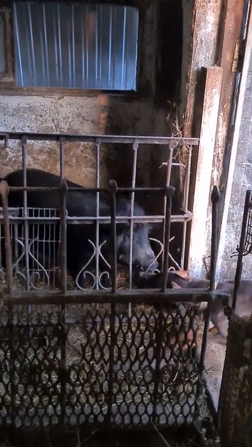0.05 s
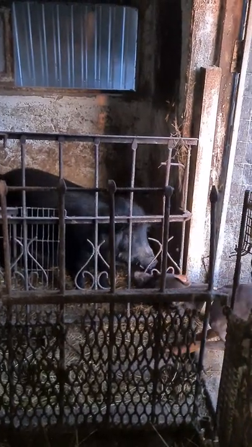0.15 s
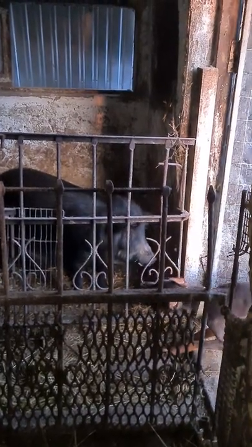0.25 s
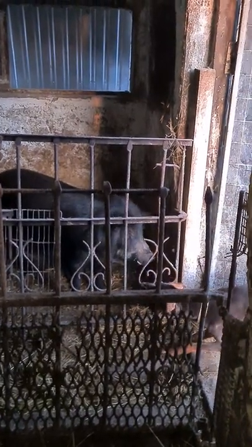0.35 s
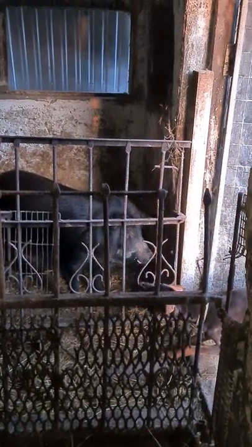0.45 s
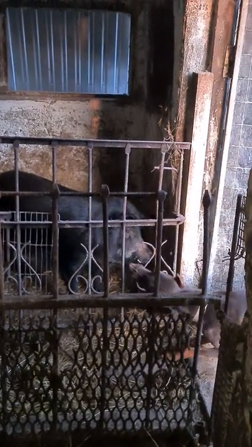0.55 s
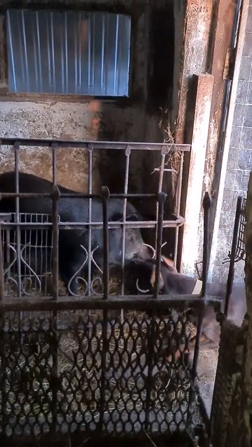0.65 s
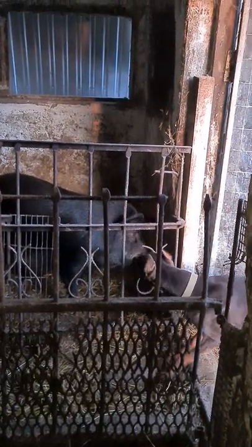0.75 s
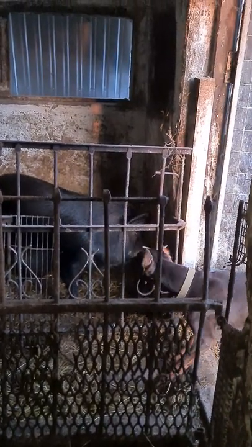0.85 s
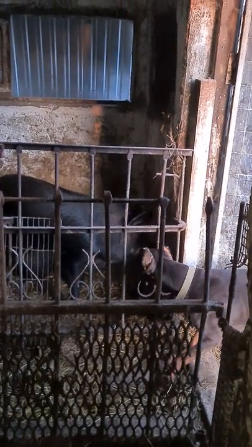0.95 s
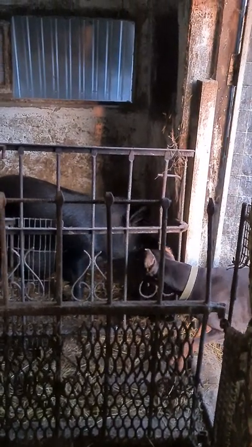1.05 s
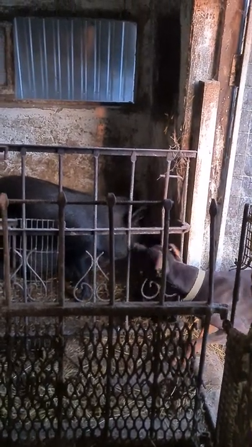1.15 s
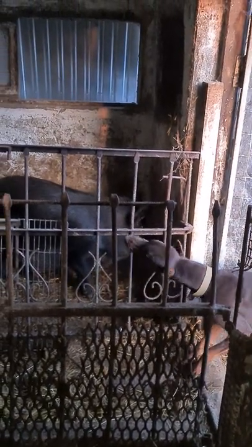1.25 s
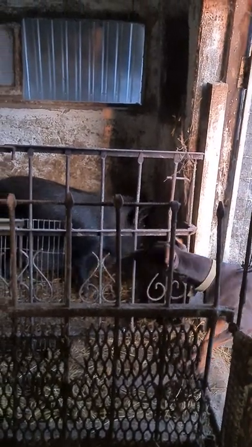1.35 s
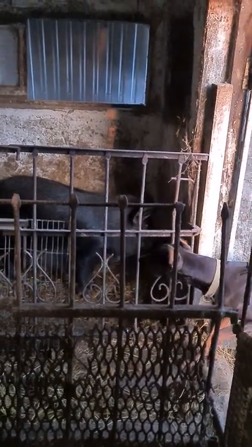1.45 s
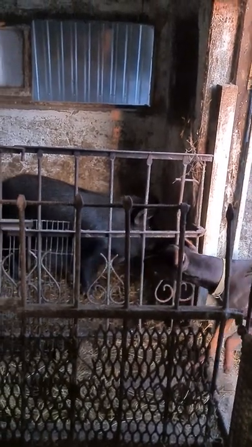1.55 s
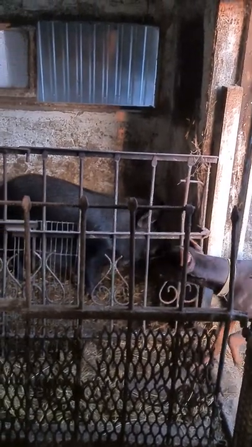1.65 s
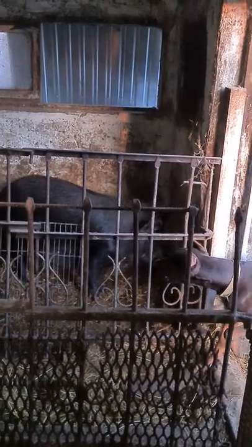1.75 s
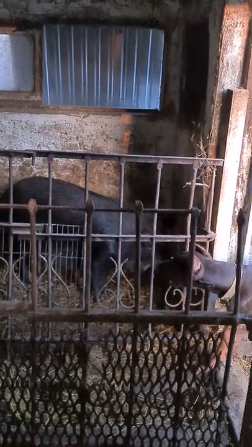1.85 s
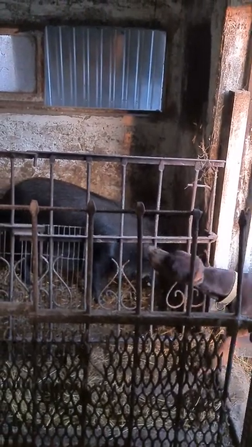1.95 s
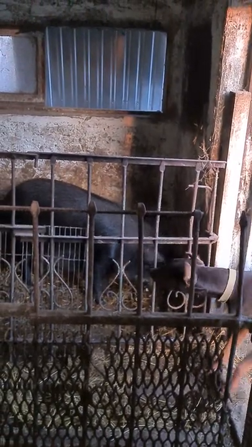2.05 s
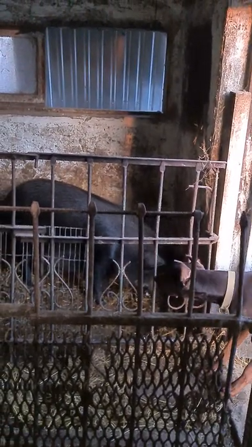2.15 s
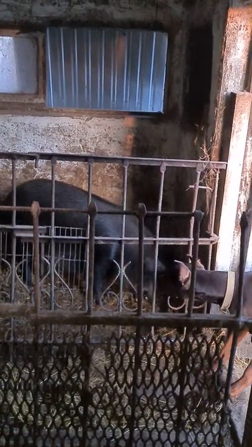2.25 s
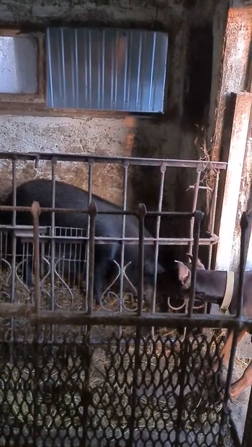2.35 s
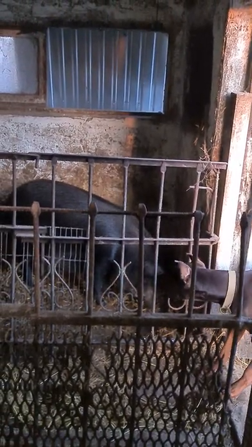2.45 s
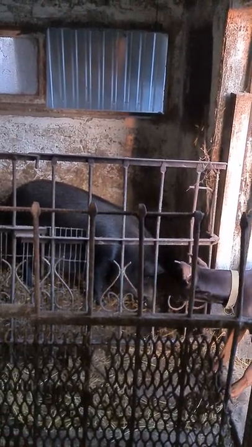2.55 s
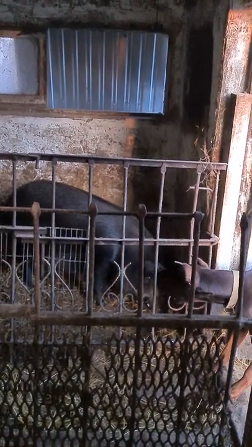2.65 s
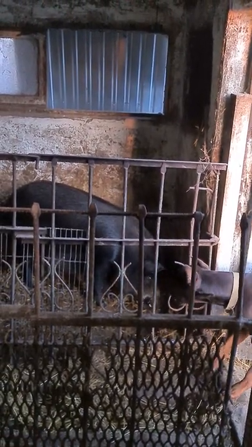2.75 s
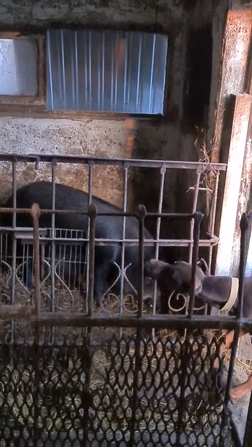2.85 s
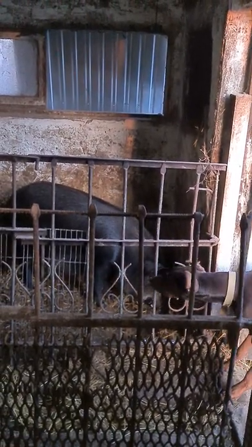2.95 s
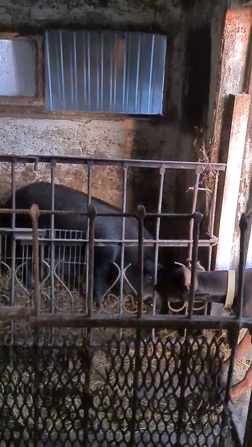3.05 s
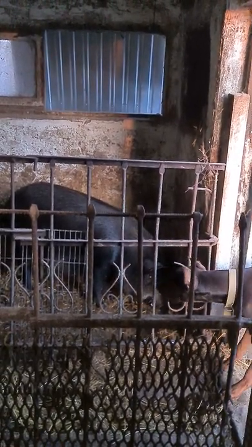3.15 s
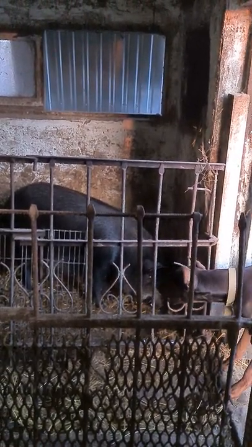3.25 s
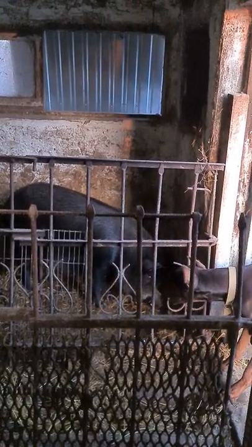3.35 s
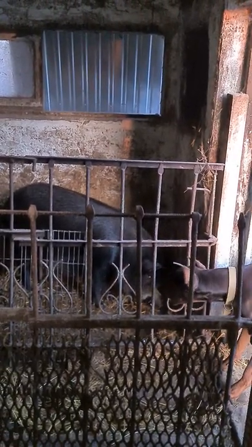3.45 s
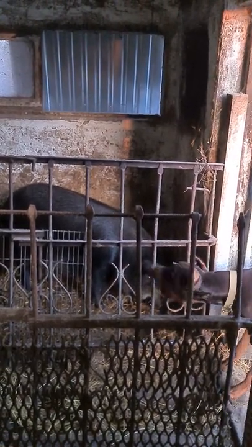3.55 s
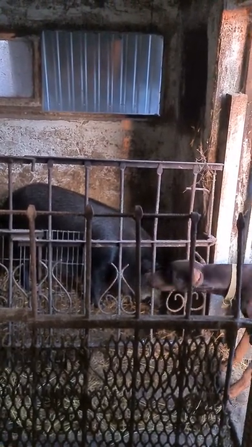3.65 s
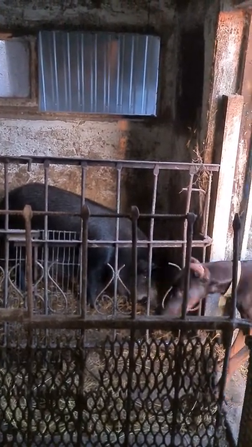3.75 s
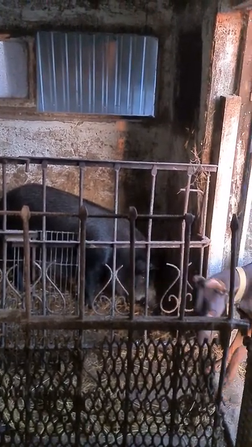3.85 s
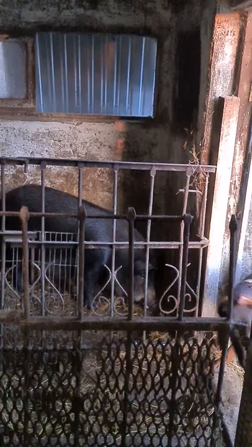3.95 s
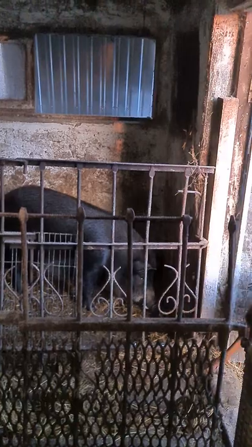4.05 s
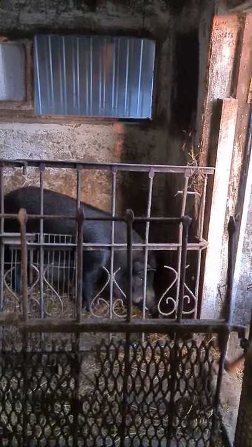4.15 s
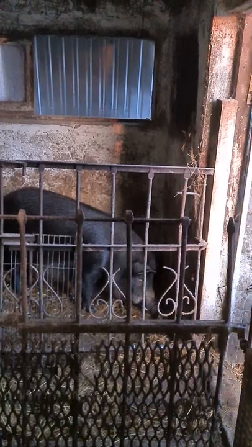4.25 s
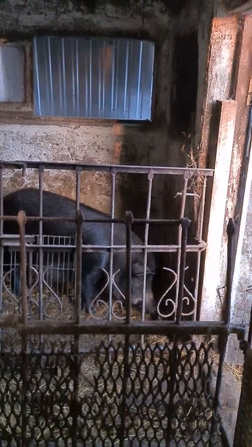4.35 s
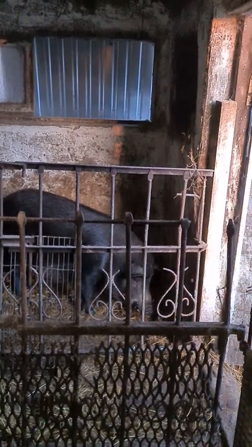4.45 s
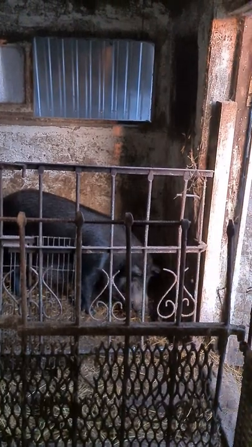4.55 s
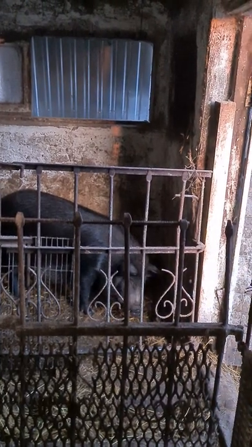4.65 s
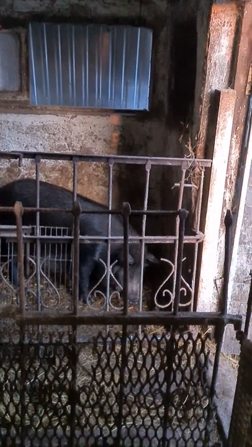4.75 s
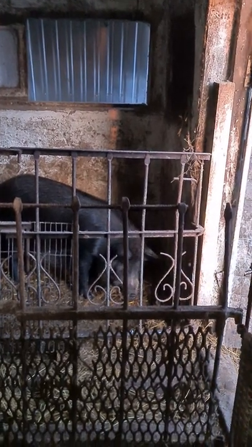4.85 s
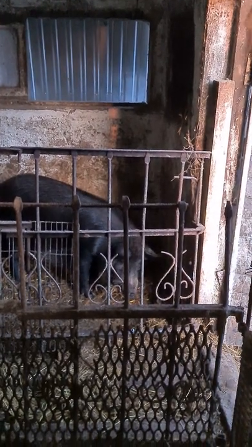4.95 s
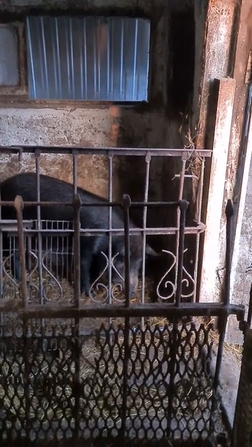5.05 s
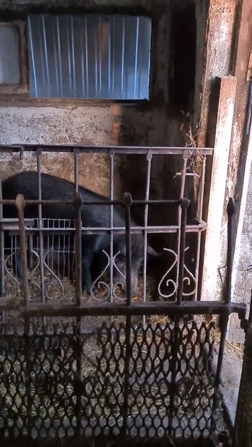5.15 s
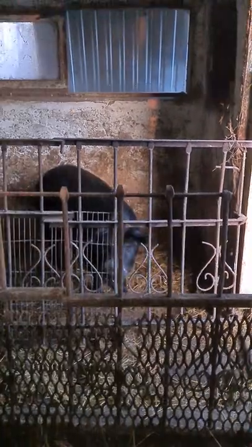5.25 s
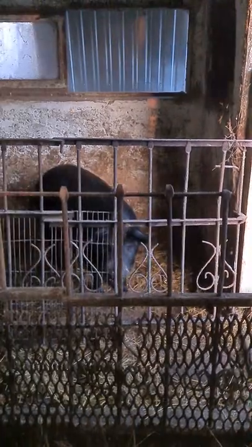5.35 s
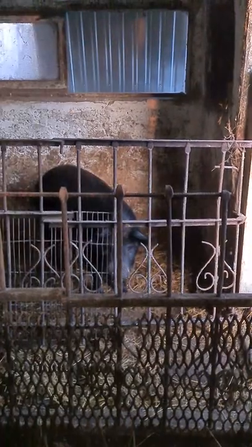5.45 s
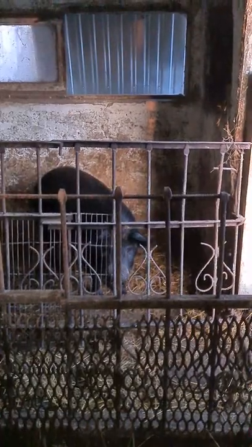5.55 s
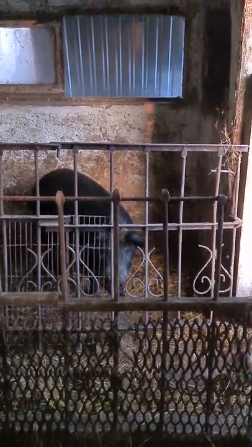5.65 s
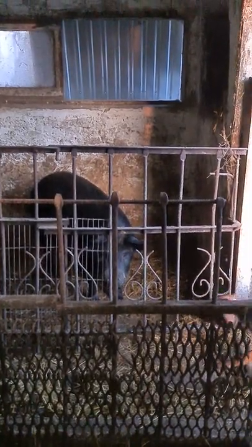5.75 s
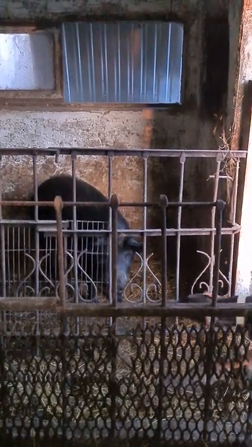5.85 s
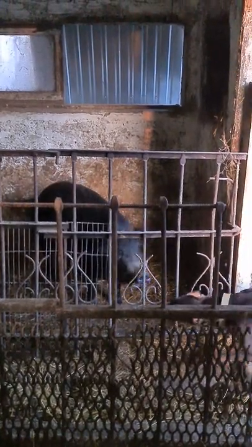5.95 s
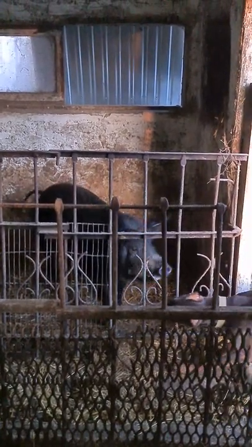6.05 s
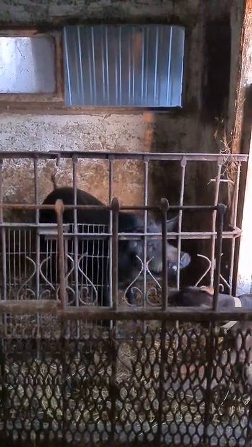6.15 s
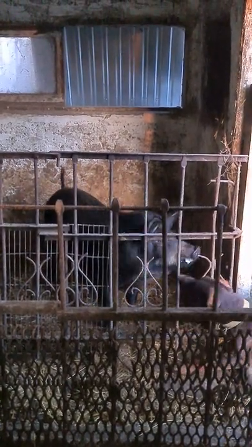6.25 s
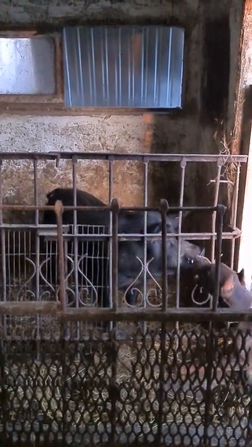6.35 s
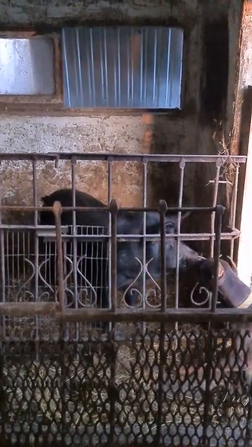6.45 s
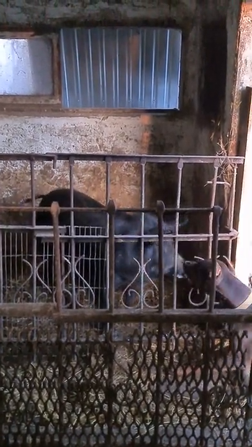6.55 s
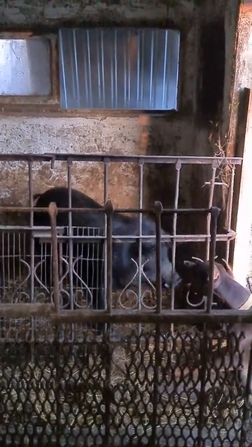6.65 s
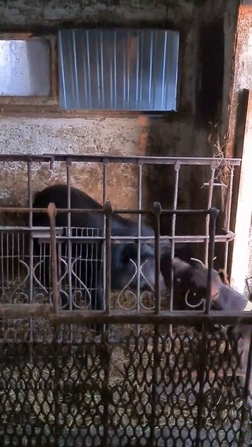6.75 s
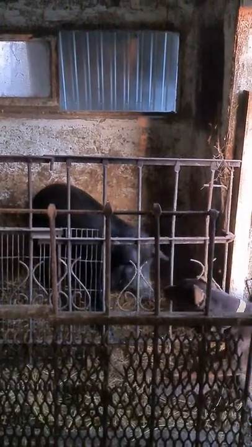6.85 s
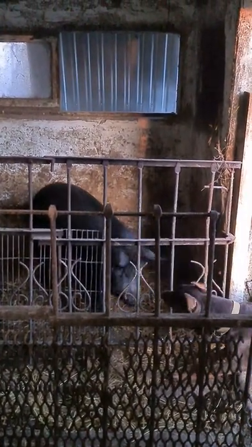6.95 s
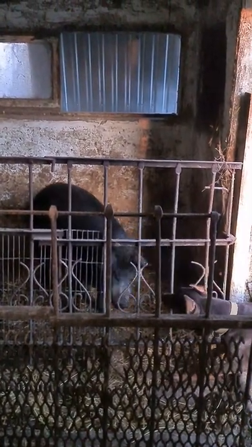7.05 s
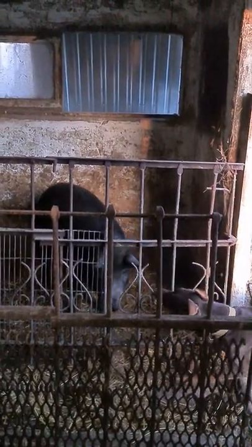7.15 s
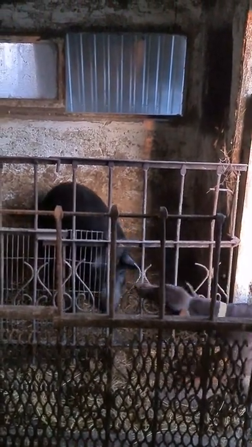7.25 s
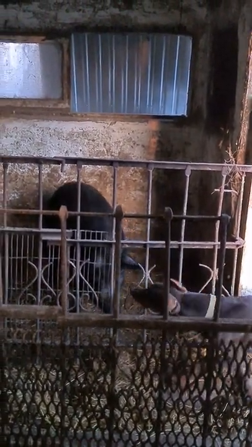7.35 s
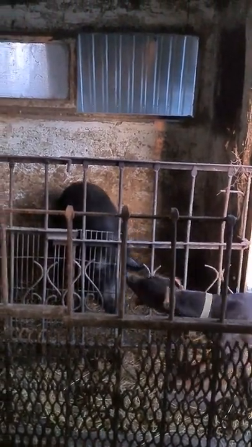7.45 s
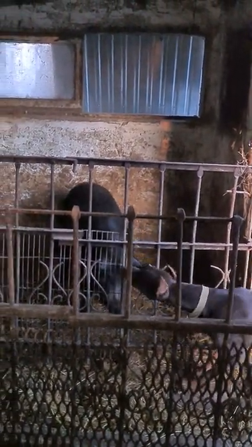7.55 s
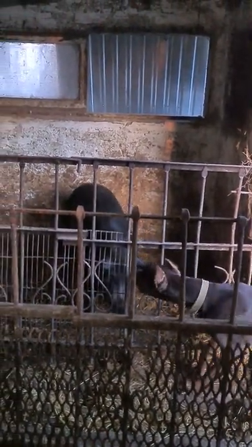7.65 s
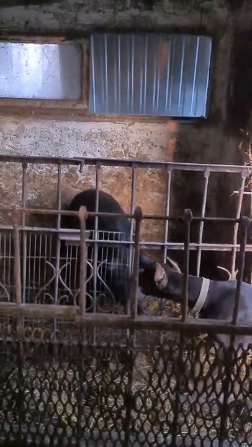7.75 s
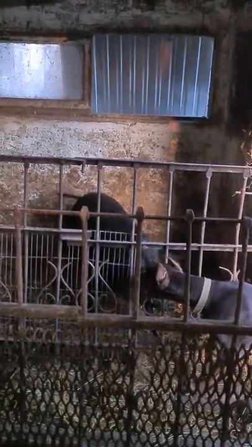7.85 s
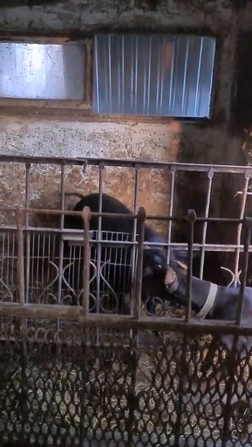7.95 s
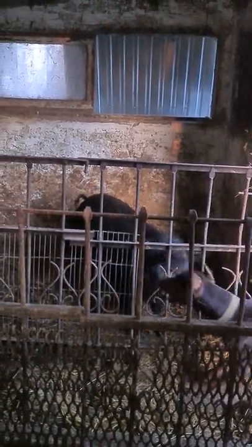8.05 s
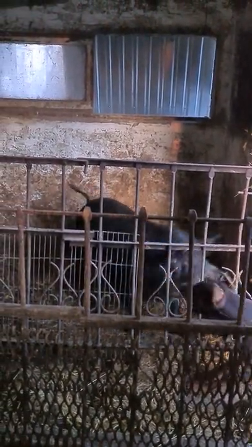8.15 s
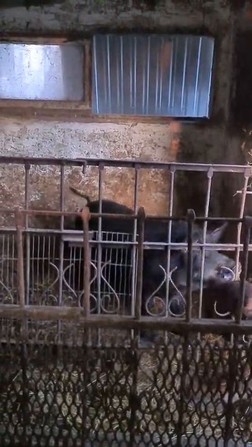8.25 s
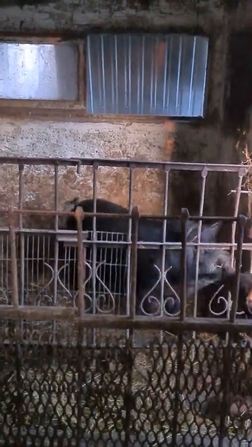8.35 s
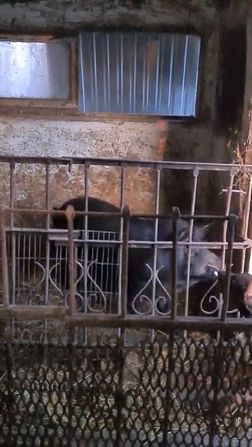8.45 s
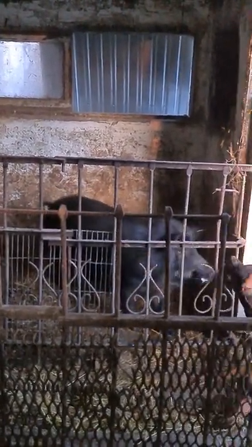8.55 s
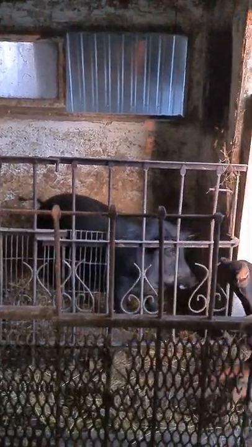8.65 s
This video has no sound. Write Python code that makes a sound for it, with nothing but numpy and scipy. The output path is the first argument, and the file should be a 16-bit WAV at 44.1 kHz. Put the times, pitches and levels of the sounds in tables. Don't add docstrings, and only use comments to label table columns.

```python
import sys
import numpy as np
from scipy import signal
from scipy.fft import rfft, irfft
from scipy.io import wavfile
from scipy.ndimage import uniform_filter1d, minimum_filter1d

SR = 44100
rng = np.random.default_rng(int(sys.argv[2]) if len(sys.argv) > 2 else 0)


def invert_db(x):
    u = np.asarray(x, float) / 20
    return 10 ** u


def digitize_waveform(pressure):
    field = np.atleast_2d(pressure).T
    bounded = np.clip(field, -1, 1)
    quanta = np.round(bounded * 32767).astype(np.int16)
    wavfile.write(sys.argv[1], SR, quanta)


N = 383229


def evened(x):
    x = np.asarray(x)
    return x / np.sqrt(np.mean(x ** 2) + 1e-20)


def steady(x, size):
    return x / np.sqrt(abs(uniform_filter1d(x ** 2, size)) + 1e-9)


def read(points, hz):
    f, value = np.transpose(points)
    return np.interp(np.log(hz + 1), np.log(f + 1), value)


def columns(rows):
    s, *rest = np.transpose(rows)
    t = np.arange(s[0], s[-1], 1 / SR)
    return [np.interp(t, s, c) for c in rest]


def add(mix, s, sound):
    at = round(s * SR)
    sound = sound[..., max(-at, 0):]
    part = mix[..., max(at, 0):][..., :sound.shape[-1]]
    part += sound[..., :part.shape[-1]]


def coloured(x, points, share=1):
    hz = np.fft.rfftfreq(x.shape[-1], 1 / SR)
    return irfft(rfft(x) * invert_db(share * read(points, hz)), x.shape[-1])


def sided(x, points):
    return np.array([coloured(x[0], points, .5), coloured(x[1], points, -.5)])


def wander(count, hz):
    b, a = signal.butter(2, hz, fs=SR)
    return evened(signal.lfilter(b, a, rng.standard_normal(count + 4000))[4000:])


def resonate(x, hz, width_hz):
    turn = np.exp(2j * np.pi * np.cumsum(hz * np.ones(len(x))) / SR)
    r = np.exp(-np.pi * width_hz / SR)
    return 2 * (turn * signal.lfilter([1 - r], [1, -r], x / turn)).real


def note(start_s, rise_s, hold_s, level_db, pitch_hz):
    release_s, release_db, sag_db, open_s = .022, -7, -3.5, 0.045
    shut_db, open_db, shut_hiss_db, open_hiss_db = -29, -5, -43.5, -29.5
    t = np.cumsum([0, abs(rise_s), abs(hold_s), release_s])
    jaw = np.clip(t / open_s, 0, 1)
    tone_db = level_db + np.array([1 - 380 * rise_s, 0, sag_db, sag_db + release_db])
    hz = pitch_hz * np.array([.96, 1, 1.02, 1])
    over_db = open_db + min(shut_db - open_db + 342 * rise_s, 0) * (1 - jaw)
    hiss_db = shut_hiss_db + (open_hiss_db - shut_hiss_db) * jaw
    rough = .33 + 3.0 * rise_s + .15 * (t == 0) + 0.17 * jaw ** 2
    return np.transpose([start_s + t, tone_db, hz, over_db, hiss_db, rough])


def rasp(start_s, length_s, level_db, pitch_hz, over_db):
    lead_s, rise_s, early_hiss_db, rough = .016, 0.016, -21.5, .55
    return [(start_s - lead_s, level_db - 16, pitch_hz * 1.1, over_db, early_hiss_db, rough),
            (start_s + rise_s, level_db, pitch_hz, over_db, early_hiss_db, rough),
            (start_s + 0.52 * length_s, level_db - 5, pitch_hz, over_db, -18, rough),
            (start_s + length_s, level_db - 16, pitch_hz * 0.87, over_db - 7.5, -37, rough)]


def whine(start_s, length_s, level_db, pitch_hz, over_db):
    ends_db, hiss_db, rough = -13, -24, 0.613
    return [(start_s + k * length_s, level_db + ends_db * abs(2 * k - 1), pitch_hz, over_db, hiss_db, rough)
            for k in (0, .5, 1)]


def bark(rows):
    # centre_hz, width_hz, level_db
    throat_modes = [(745, 87.5, 12), (1109, 130, 1), (1352, 150, -1.5), (1594, 206, 1), (2050, 263, -4.5),
                    (2625, 257, -15)]
    # freq_hz, density_db_per_hz
    teeth_hiss = [(1880, -17), (3200, -3.5), (3930, -8.5), (4820, -6.5), (5650, -7.5), (6370, -7),
                  (7130, -10.5), (7820, -22), (9350, -6.5), (10600, -12), (11900, -2), (15600, -17)]
    tone_db, hz, over_db, hiss_db, rough = columns(rows)
    count = len(hz)
    rough = np.clip((rough - .36) / .36, .18, 1)

    jitter = 0.0634 * rough * wander(count, 102.7) + 0.011 * wander(count, 26.4)
    turns = np.cumsum(hz * (1 + jitter)) / SR
    chest = resonate(resonate(rng.standard_normal(count), 0.92 * hz, 230), 1.01 * hz, 210)
    tone = evened(np.sin(2 * np.pi * turns)) * invert_db(3.76 * rough * wander(count, 70))
    tone = tone + 0.55 * rough * evened(chest)

    folds = sum(invert_db(3.5 * wander(count, 20) - 2.2 * k) * np.cos(2 * np.pi * k * turns) for k in range(2, 7))
    folds = folds * (1 + 0.59 * rough * np.cos(np.pi * turns))
    puffs = (.5 + np.exp(-(turns % 1) / 0.42)) * rng.standard_normal(count)
    drive = (1 - .5 * rough) * evened(folds) + (.2 + .85 * rough) * evened(puffs)

    mouth = 1 + 0.05 * wander(count, 9.3)
    throat = 0
    for k, (f, width_hz, db) in enumerate(throat_modes):
        mode = resonate(resonate(drive, f * mouth, width_hz), f * mouth, 3 * width_hz)
        throat = throat + (-1) ** k * invert_db(db) * mode
    voice = invert_db(0.44) * (steady(tone, size=1300) + invert_db(over_db) * steady(throat, size=1300))
    voice = signal.sosfilt(signal.butter(4, 320, "high", fs=SR, output="sos"), voice)

    gate = (1 + 0.22 * np.cos(2 * np.pi * turns)) * invert_db(0.72 * wander(count, 62))
    air = evened(coloured(gate * rng.standard_normal((2, count)), teeth_hiss))
    air[0] += .5 * evened(resonate(air[0], 9 * hz, 150))
    air += sum(0.59 * invert_db(3.9 * wander(count, 25)) * evened([resonate(a, f * mouth, 370) for a in air])
               for f in rng.uniform(4660, 6940, size=3))

    i = np.arange(count)
    edge = np.minimum(1, np.minimum((i / 400) ** 2, i[::-1] / 700))
    return invert_db(tone_db) * edge * np.array([voice, *(invert_db(hiss_db - 7.5) * air)])


def grunt(start_s, length_s, level_db, pitch_hz):
    ends_db = level_db - 3.5
    db, hz = columns([(0, ends_db, pitch_hz), (0.94 * length_s, level_db, pitch_hz),
                      (length_s, ends_db, pitch_hz * 0.8)])
    turns = np.cumsum(hz * (1 + 0.18 * wander(len(hz), 61))) / SR
    pulses = np.sin(2 * np.pi * turns) + 0.58 * np.sin(4 * np.pi * turns) + 0.5 * np.sin(6 * np.pi * turns)
    return invert_db(db + 3.0 * wander(len(hz), 30)) * evened(pulses) * signal.windows.tukey(len(hz), .3)


def snort(length_s, level_db):
    # freq_hz, density_db_per_hz
    snout_air = [(180, -19), (300, -6), (600, -11), (836, -12.5), (1440, -3.5), (2110, -5.5), (3400, -15),
                 (7040, -10), (8440, -25), (13200, -15.5), (15600, -31)]
    rise_s, fade_db = 0.017, -32.5
    t = np.arange(0, length_s, 1 / SR)
    db = level_db + fade_db * np.sqrt(t / length_s) + 0.5 * wander(len(t), 60)
    blast = evened(coloured(rng.standard_normal((2, len(t))), snout_air))
    return np.minimum(t / rise_s, 1) ** 2 * invert_db(db) * blast


def walls(x):
    # delay_s, left_db, right_db
    echoes = [(.0031, -9, -4), (.0058, -5, -12), (.0094, -12, -7), (.0141, -8, -14)]
    taps = np.zeros((2, 1000))
    for s, *db in echoes:
        taps[:, min(round(s * SR), 999)] = invert_db(db) * [1, -1]
    echoed = signal.oaconvolve(x, taps, axes=1)[:, :N]
    return signal.sosfilt(signal.butter(2, 750, "high", fs=SR, output="sos"), echoed)


def pen(x):
    # freq_hz, t60_s
    decay = [(150, 0.68), (480, 0.31), (1000, 0.38), (2000, 0.31), (4000, 0.26), (10000, 0.15)]
    taps = np.zeros((2, SR))
    at = np.arange(400, SR - 20, 20) + rng.integers(0, 20, (2, (SR - 401) // 20))
    np.put_along_axis(taps, at, rng.choice([-1., 1.], at.shape), 1)
    hz, t, z = signal.stft(taps, SR, nperseg=256)
    same = np.clip(1 - hz / 700, 0, 1)[:, None]
    z[1] = same * z[0] + np.sqrt(1 - same ** 2) * z[1]
    fade = invert_db(-60 * t / read(decay, hz)[:, None]) * np.minimum(t / .025, 1)
    tail = signal.istft(z * fade, SR, nperseg=256)[1]
    return signal.fftconvolve(x, tail / np.linalg.norm(tail[0]), axes=1)[:, :N]


def pause(loud):
    power_db = 10 * np.log10(abs(uniform_filter1d(loud ** 2, 800)) + 1e-12)
    last = np.maximum.accumulate(np.where(power_db > -22, np.arange(N), 0))
    return (np.arange(N) - last) / SR


def lifted(quiet_s):
    return invert_db(uniform_filter1d(14 * (1 - np.exp(-(quiet_s / 0.96) ** 2)), 600))


def motor(quiet_s):
    # freq_hz, density_db_per_hz
    rumble_curve = [(15, -32), (30, -15), (55, -12.5), (80, -3), (105, -16), (140, -41)]
    # centre_s, half_width_s, lift_db
    gusts = [
        (0.0, .08, 14),
        (5.25, 0.065, 6.5),
        (6.7, 0.3, 11),
        (7.98, .2, 11),
        (8.2, 0.027, -19),
    ]
    ducked_db, lift_db, lift_s, swell_db, lag_s = -65, 40.5, 2.12, 1.5, .04
    t = np.arange(N) / SR
    db = ducked_db + uniform_filter1d(lift_db * (1 - np.exp(-(quiet_s / lift_s) ** 0.74)), 1000)
    db = np.interp(t - lag_s, t, db)
    db = db + swell_db * wander(N, 1.15) + sum(g * np.exp(-((t - s) / w) ** 2) for s, w, g in gusts)
    tone = evened(resonate(resonate(rng.standard_normal(N), 82.18, 2.2), 80.2, 5.4))
    noise = rng.standard_normal((3, N))
    rumble = evened(coloured(noise[0] + 0.045 * noise[1:], rumble_curve))
    return invert_db(db - 0.5) * (tone + invert_db(-1.0) * rumble)


def yard():
    # freq_hz, density_db_per_hz
    wash_curve = [(62, -31), (105, -11.5), (170, 0.5), (287, -19.5), (325, -19), (361, -12), (886, -12.5),
                  (1400, -17.5), (3680, -14), (4630, -19.5), (6740, -14), (8850, -29.5), (13200, -16.5),
                  (15600, -25.5)]
    # freq_hz, correlation
    likeness = [(60, 0.5), (180, 0.96), (550, 0.51), (1650, 0.5), (4970, 0.029), (15000, -0.21)]
    # freq_hz, left_minus_right_db
    balance = [(60, 0), (180, -1), (550, -2.5), (1650, -1), (4970, -6), (15000, -13)]
    # freq_hz, ducked_level_db, width_hz
    overtones = [(160.6, -67, 5.5), (313.6, -65.5, 1.5), (617, -69, 36), (840, -69, 4.7)]
    ducked_db = -53
    frames, hz = N // 512 + 5, np.fft.rfftfreq(2048, 1 / SR)
    a, b, c, d, patches = rng.standard_normal((frames, 1025, 5)).T
    patches = evened(uniform_filter1d(uniform_filter1d(patches, 24, 0), 8, 1))
    same, left = np.clip(read(likeness, hz), -1, 1)[:, None], a + 1j * b
    z = np.array([left, same * left + np.sqrt(1 - same ** 2) * (c + 1j * d)])
    z *= invert_db(read(wash_curve, hz)[:, None] + 1.1 * patches)
    wash = sided(signal.istft(z, nperseg=2048, noverlap=1536)[1][:, :N], balance)
    wash = invert_db(ducked_db) * wash / np.std(wash.mean(0))
    hum = sum(invert_db(db) * evened(resonate(rng.standard_normal(N), f, w)) for f, db, w in overtones)
    return wash + hum


def scene():
    # start_s, rise_s, hold_s, level_db, pitch_hz
    notes = [(0.087, .022, .03, -12, 538), (0.462, .03, 0.046, -11, 551), (1.145, .017, 0.021, -8, 537.3),
             (1.894, 0.015, 0.0095, -8, 570), (2.795, .013, 0.026, -8, 552),
             (3.519, 0.024, 0.029, -8.5, 551.3), (5.533, 0.024, 0.0065, -12.5, 630),
             (5.765, 0.043, 0.0095, -10, 536.7), (6.026, 0.042, 0.017, -6.5, 527.3),
             (6.355, 0.025, 0.066, -14, 502.4), (6.688, 0.029, 0.042, -8, 555.6),
             (7.168, .015, 0.018, -8.5, 562.7), (7.422, 0.05, 0.042, -11.5, 503.3),
             (8.215, .05, 0.027, -10, 526.6), (8.285, 0.0368, 0.042, -18, 535.4),
             (8.528, 0.037, 0.019, -14.5, 559)]
    # start_s, length_s, level_db, pitch_hz, overtones_re_tone_db
    rasps = [(-0.09, 0.14, -21.5, 479, 3), (0.138, 0.11, -16.5, 520.2, -1), (0.546, .08, -22, 466.3, 0.5),
             (1.179, .13, -12.5, 484.6, -1), (1.929, 0.1, -11.5, 469.5, -1.5),
             (2.827, 0.11, -13.5, 481.3, -2), (3.575, 0.098, -12, 486, -4), (5.555, .13, -4.5, 486.5, -4),
             (5.813, 0.12, -12, 451.5, -1), (6.094, 0.095, -19.5, 516, -1.5), (6.763, 0.1, -23, 465.5, 3.5),
             (7.2, 0.1, -11, 449, 0), (7.498, 0.12, -15.5, 454.3, 0.5), (8.226, .18, -19, 558.5, 3.5),
             (8.302, .11, -20.5, 443.7, -5), (8.587, 0.097, -10, 473.8, -2.5)]
    # start_s, length_s, level_db, pitch_hz, overtones_re_tone_db
    whines = [
        (0.329, 0.35, -37.5, 536, -3),
        (6.19, 0.3, -32, 531, -6),
        (6.54, 0.32, -34, 531.4, -3),
        (8.085, 0.32, -20.5, 552.6, -9.5),
        (8.401, 0.3, -30, 512, -11),
    ]
    # start_s, length_s, level_db, pitch_hz
    grunts = [
        (0.25, 0.23, -45.5, 119.1),
        (0.62, 0.23, -55, 113),
        (5.68, 0.11, -42, 110),
        (5.919, 0.25, -48, 107.3),
        (6.15, 0.24, -46.5, 122),
        (6.5, 0.22, -42.5, 112.7),
        (7.3, 0.18, -41.5, 140.3),
        (8.05, 0.24, -33, 117),
        (8.4, 0.18, -40.5, 115),
    ]
    # freq_hz, width_hz, level_db
    ring_modes = [(483.3, 4.8, 3.5), (853, 11.7, 2.5), (1260, 14, -17), (1220, 26, 7.5)]
    # freq_hz, left_minus_right_db
    dog_balance = [(300, -1), (700, -1.5), (1400, -2.5), (2800, -4), (4500, -14), (9000, -17), (14000, -22)]
    dog, pig = np.zeros((3, N)), np.zeros((2, N))
    for shape, table in ((note, notes), (rasp, rasps), (whine, whines)):
        for row in table:
            rows = shape(*row)
            add(dog, rows[0][0], bark(rows))
    for row in grunts:
        add(pig, row[0], grunt(*row)[None])
    add(pig, 7.91, snort(length_s=0.53, level_db=-22.5))

    near, quiet_s = dog[0] + dog[1:], pause(dog[0])
    rings = [[invert_db(db) * resonate(dog[0], f * k, w) for f, w, db in ring_modes] for k in (1, 1.012)]
    heard = sided(near + walls(near) + invert_db(-6) * pen(near) + np.sum(rings, 1), dog_balance)
    return heard + pig + invert_db(-15.0) * pen(pig) + lifted(quiet_s) * yard() + motor(quiet_s)


def band_limit(x):
    return signal.sosfilt(signal.butter(12, 15710, fs=SR, output="sos"), x)


def record(dry):
    peak_db = 20 * np.log10(-minimum_filter1d(-abs(dry).max(0), 120) + 1e-9)
    fall_db = np.arange(N) * 76.0 / SR
    over_db = np.maximum(np.maximum.accumulate(peak_db + fall_db) - fall_db + 1.2, 0)
    held = dry / invert_db(.85 * uniform_filter1d(over_db, 100))
    return band_limit(np.clip(held, -1, 1))


dry = scene()
out = record(dry)
digitize_waveform(out)
```